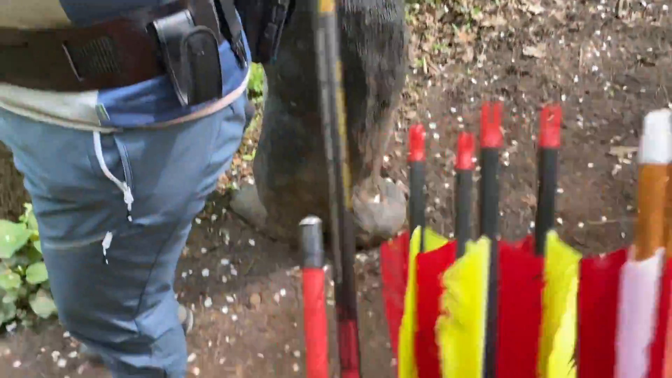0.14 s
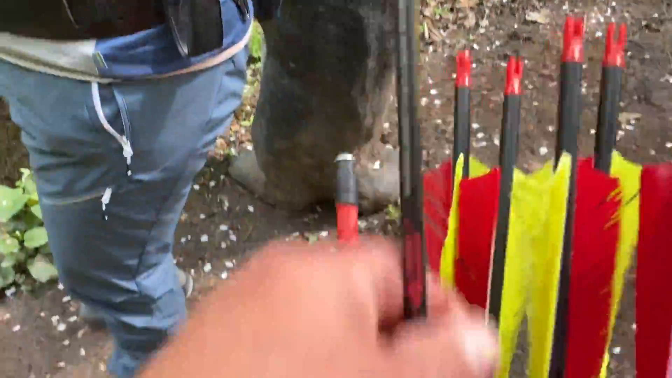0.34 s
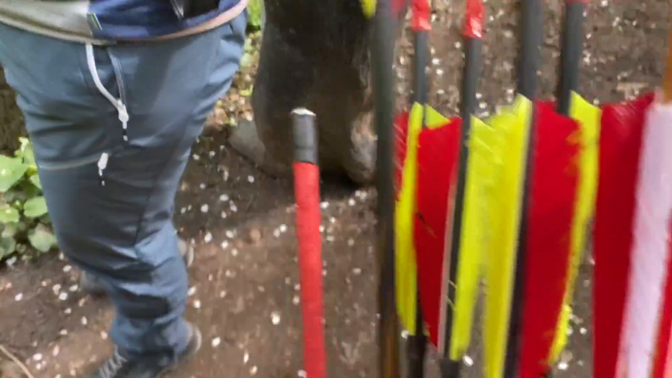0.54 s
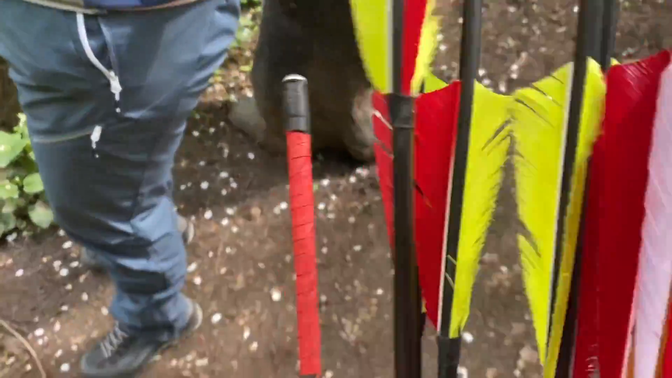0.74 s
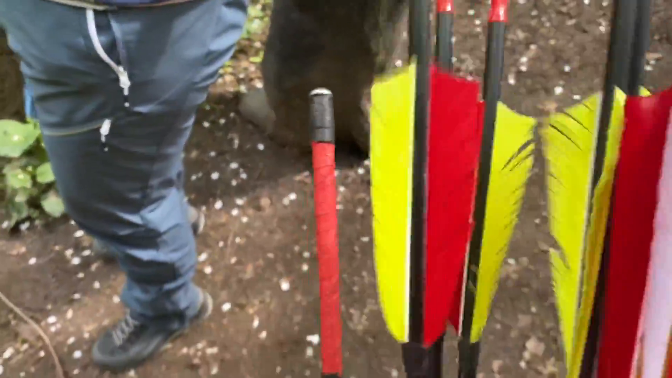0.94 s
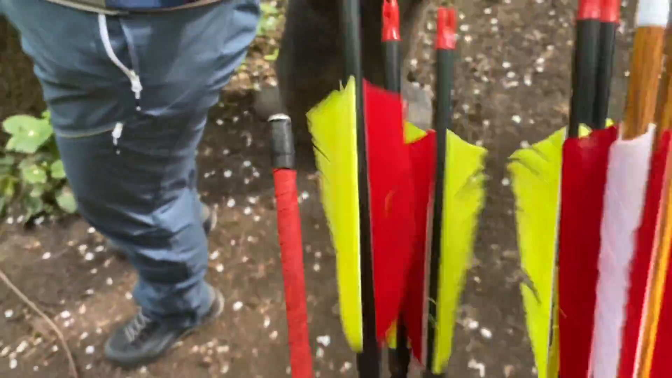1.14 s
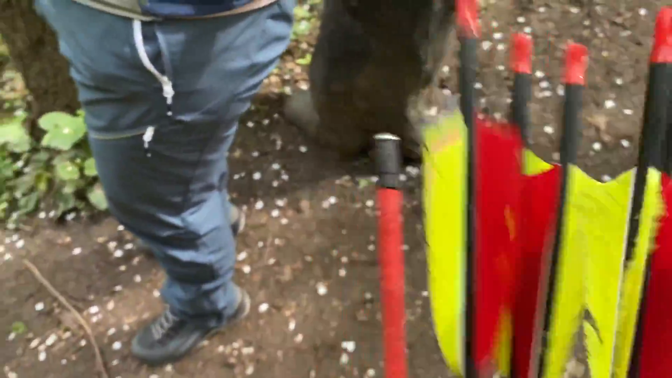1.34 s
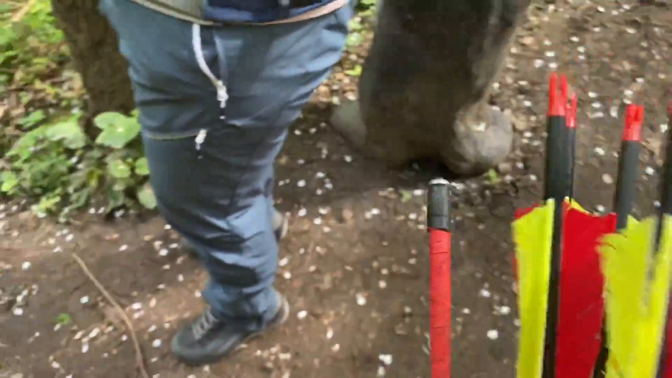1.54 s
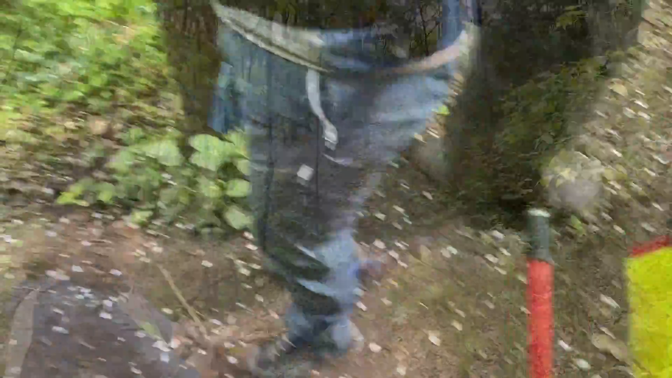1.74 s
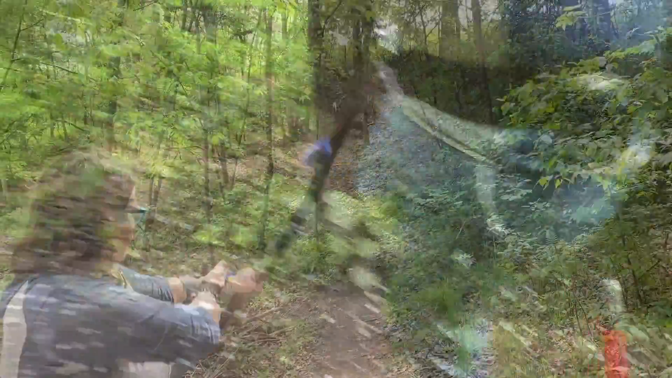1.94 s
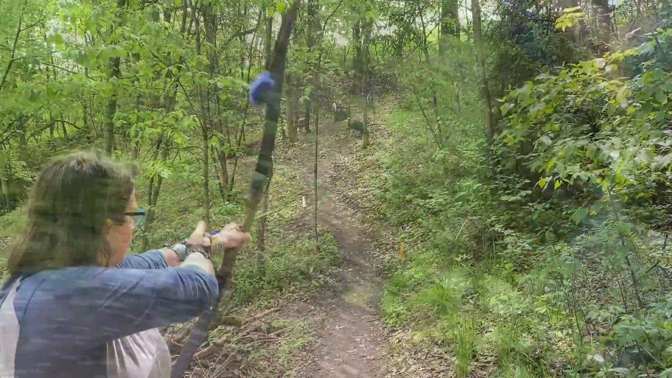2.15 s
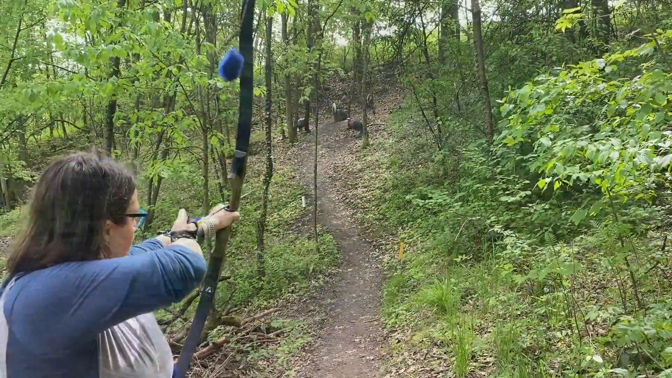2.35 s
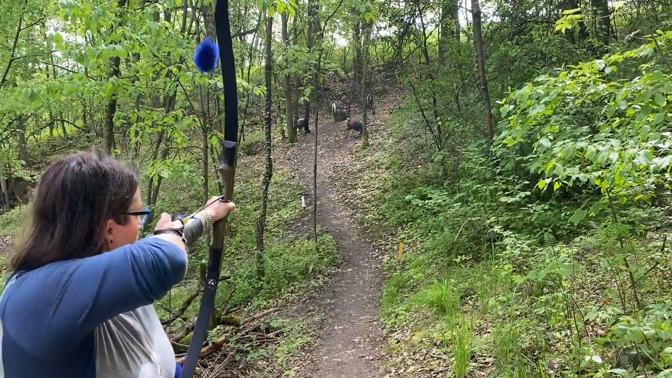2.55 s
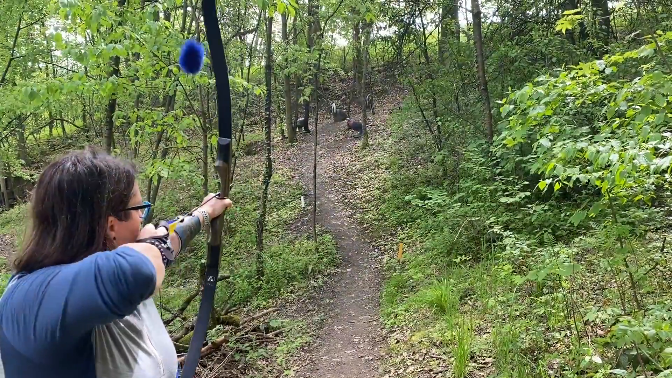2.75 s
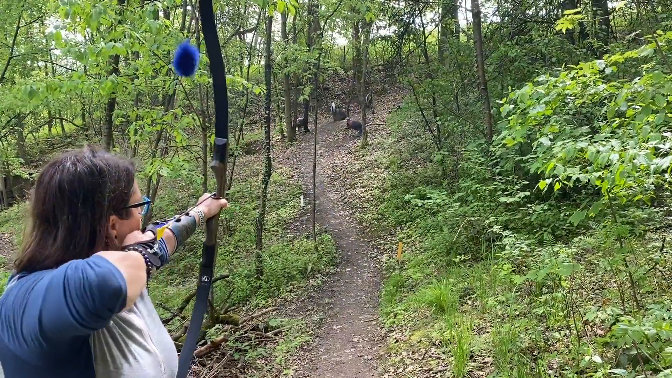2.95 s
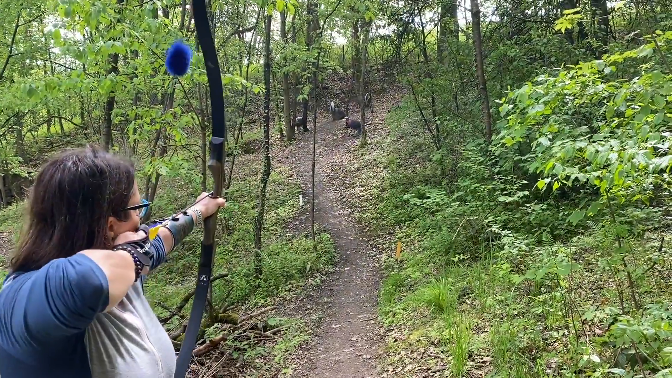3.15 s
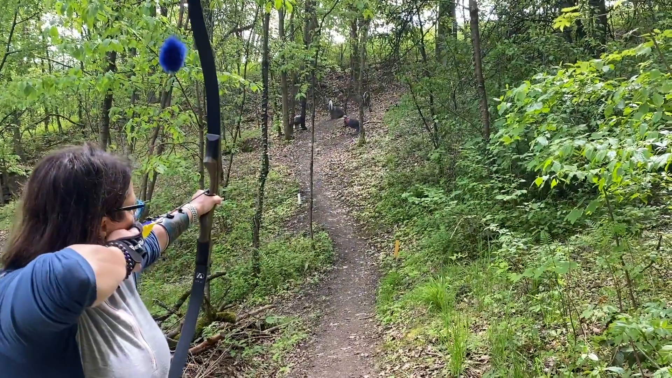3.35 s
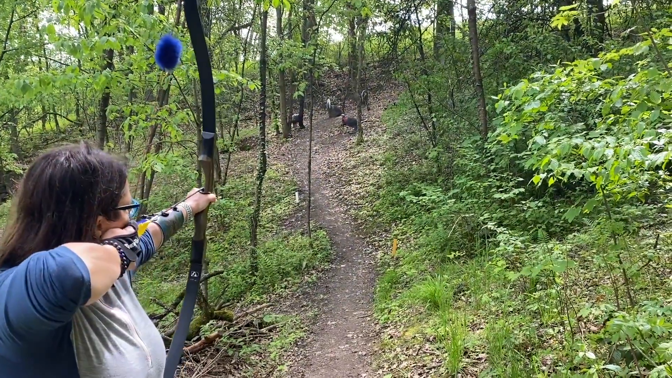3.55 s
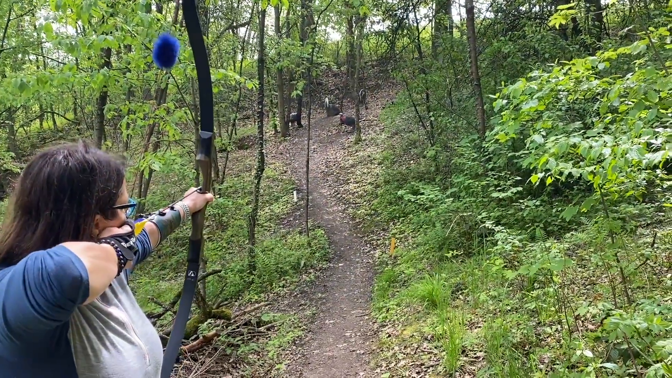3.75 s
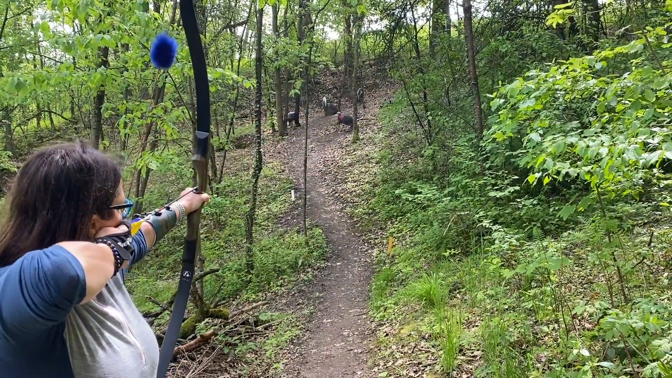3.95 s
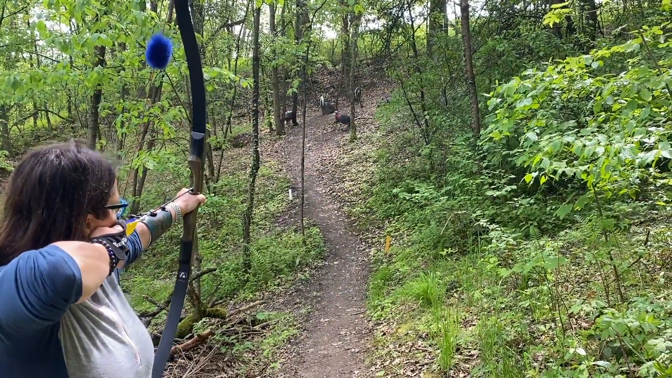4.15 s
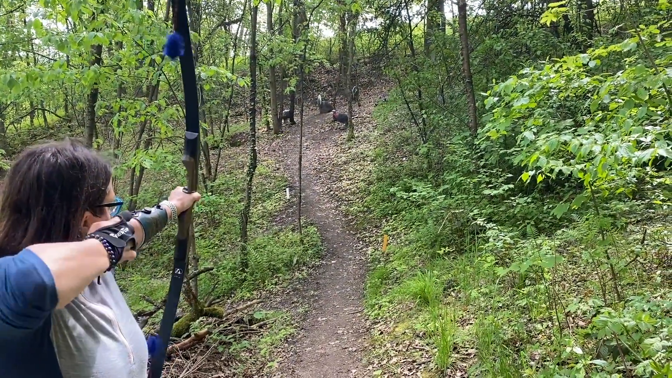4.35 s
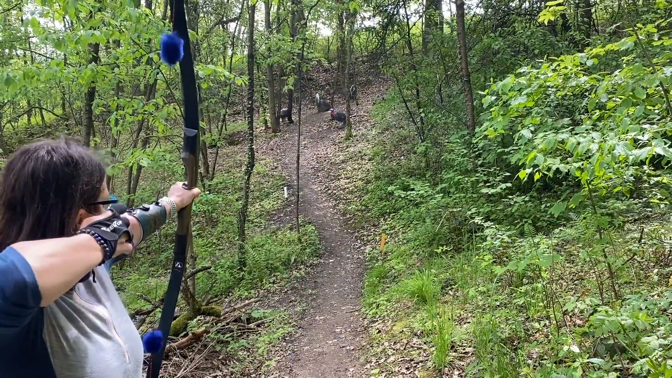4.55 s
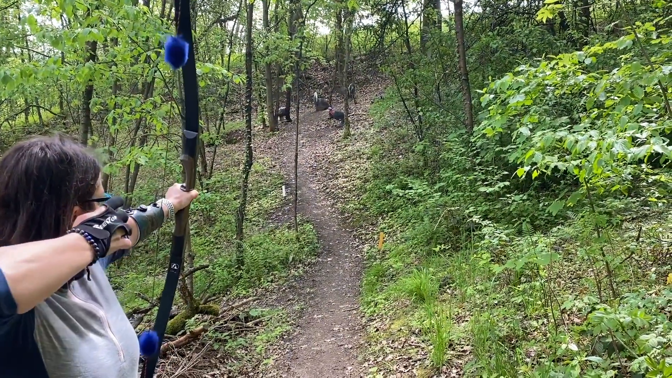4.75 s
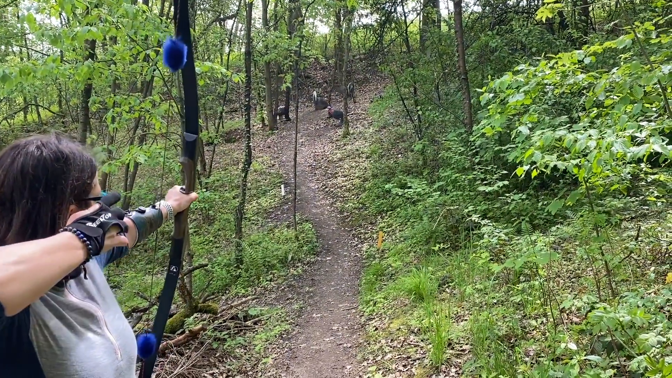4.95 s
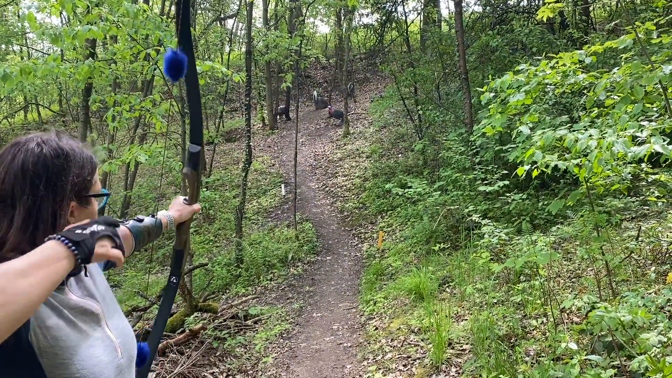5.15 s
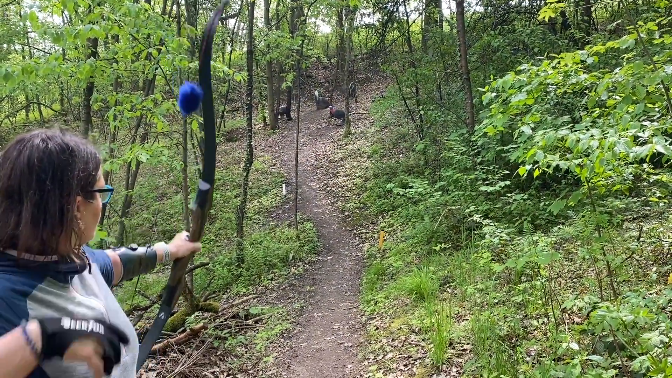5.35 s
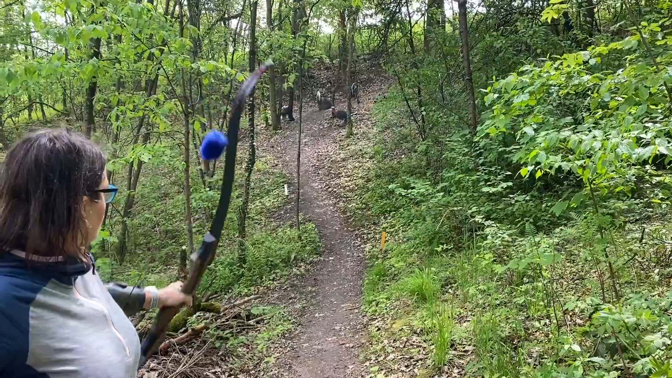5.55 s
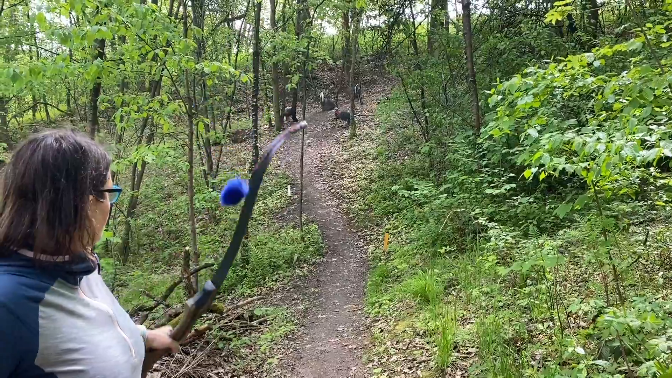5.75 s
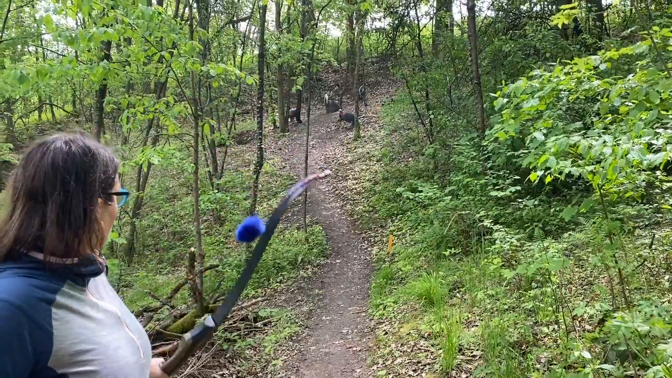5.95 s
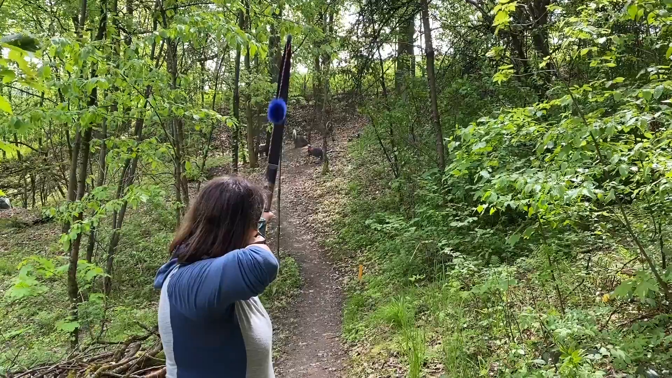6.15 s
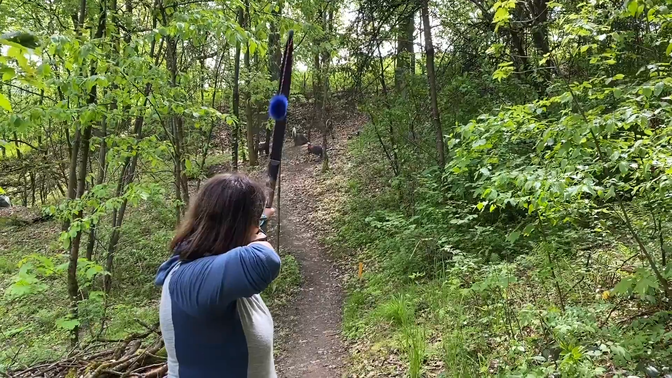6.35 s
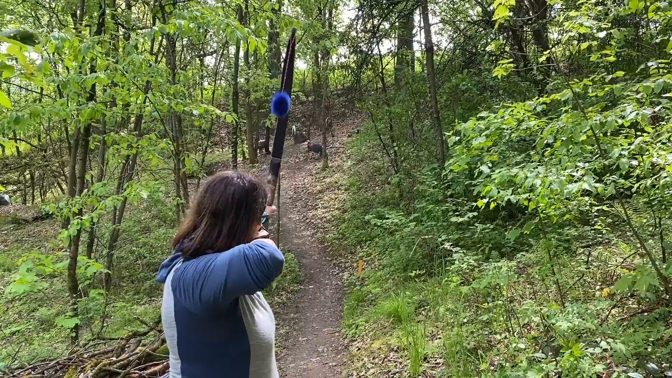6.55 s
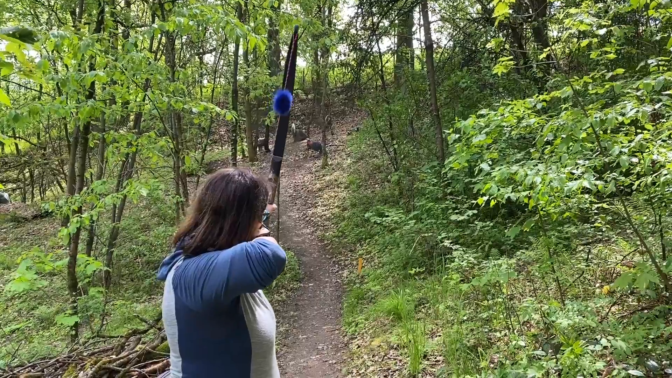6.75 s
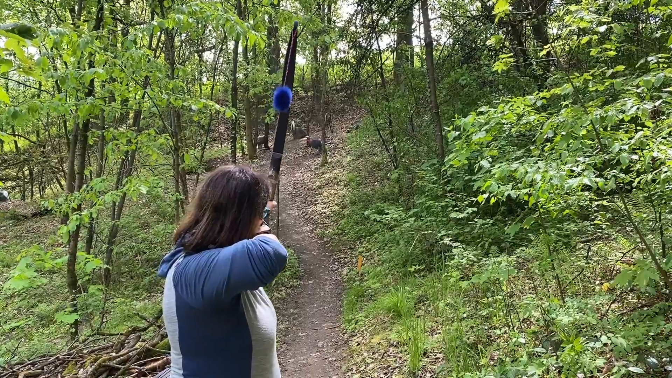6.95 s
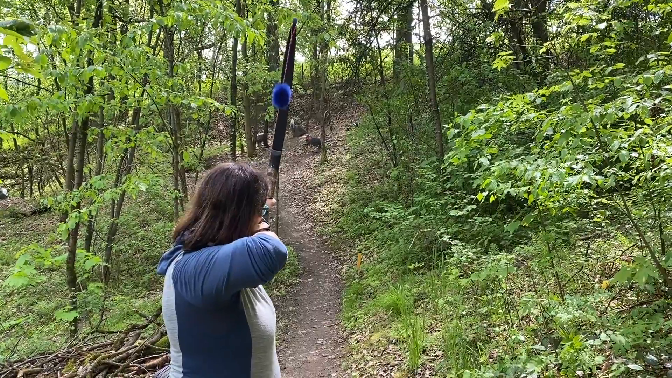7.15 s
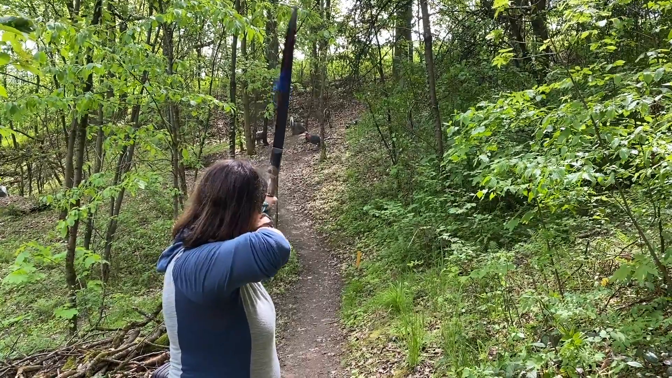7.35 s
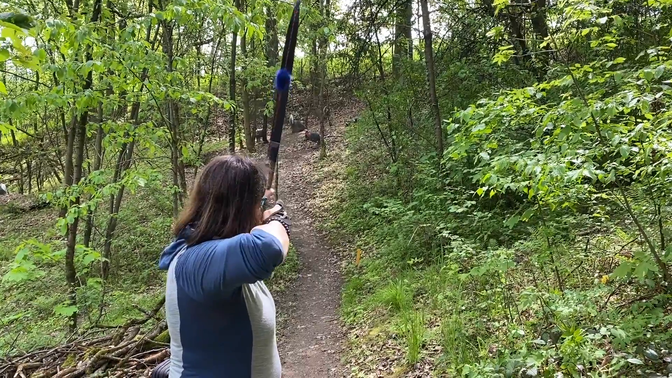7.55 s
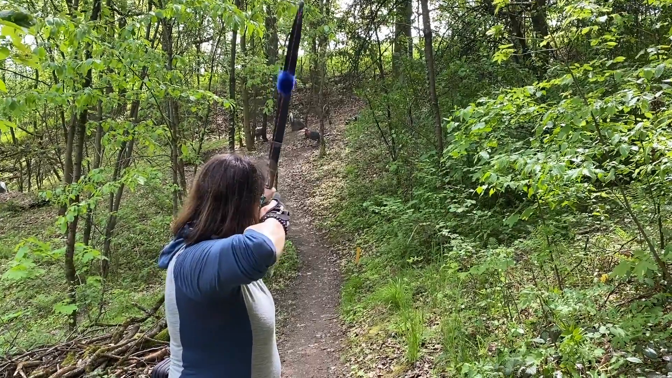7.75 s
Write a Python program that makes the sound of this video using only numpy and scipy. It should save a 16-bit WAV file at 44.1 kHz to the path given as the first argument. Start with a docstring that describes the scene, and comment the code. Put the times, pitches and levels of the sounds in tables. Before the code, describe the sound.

Outdoors in a wood, arrows are handled right at the microphone: scratchy feathers, bright rattling clacks, hollow tube knocks and soft wind bumps. After almost two seconds it falls quiet, leaving songbirds over faint hiss and rumble. One nearby bowshot snaps and thumps, its arrow landing with a dull, short distant thud. Cloth and leaves stir softly as birds chirp, then another bowshot cracks with a short woodland echo.

```python
"""Close to the microphone, arrows are pushed about in a quiver: feathers rustle as grainy noise, shafts clack
and points knock the tube as ringing modes with noise, and wind thumps the microphone as a low mode.
In the background lie a low rumble, a smooth hiss and blurred far birds, all filtered noise.
In the quiet wood a songbird whistles in gliding sines, and leaves snap as short noise bursts.
A bow is then loosed in stages of crack, grip and limb; its arrow brushes leaves and thuds into far foam.
Feathers and cloth rub again as the bow is lowered, then it is loosed once more. Trees echo the sounds."""
import sys
import numpy as np
from scipy import signal
from scipy.fft import rfft, irfft
from scipy.io import wavfile

SR = 44100
rng = np.random.default_rng(int(sys.argv[2]) if len(sys.argv) > 2 else 0)


def dump_mix(stems):
    """Bounce the given channels to the path in sys.argv[1] as a 16-bit WAV at rate SR."""
    frames = np.atleast_2d(stems).T  # one column per channel
    limited = np.clip(frames, -1, 1)  # hard clip at full scale
    pcm = np.round(limited * 32767).astype(np.int16)
    wavfile.write(sys.argv[1], SR, pcm)


N = 347949
T = np.arange(N) / SR   # s


def amp(db):
    """Decibels to gain."""
    return 10 ** (np.asarray(db) / 20)


def rms_one(x):
    """Scale to rms 1."""
    return x / np.sqrt(np.mean(x ** 2) + 1e-20)


def at_hz(points, hz):
    """Read a table on a log-frequency axis."""
    table = np.array(points)
    return np.interp(np.log(hz), np.log(table[:, 0]), table[:, 1])


def drift(rate):
    """Random points of spread 1, joined by straight lines; rate is points per second."""
    steps = rng.standard_normal(int(N / SR * 100) + 2)
    return np.interp(T * np.clip(rate, .1, 99), np.arange(len(steps)), steps)


# Likeness of the two sides of the noise. Each row: frequency in Hz, left-right correlation.
LIKENESS = [(60, 0.94), (300, 0.57), (700, 0.029), (3000, 0.19), (7000, 0.35)]
EDGES = 25 * 2 ** np.arange(0, 9.6, .5)   # half-octave band edges, Hz


def bands(length=N):
    """Half-octave bands of stereo noise, as (centre Hz, left and right)."""
    white = rng.standard_normal((2, 2, length))
    for k, (low, high) in enumerate(zip(EDGES, EDGES[1:])):
        band = signal.butter(2, [low, high], "band", fs=SR, output="sos")
        mid, side = signal.sosfilt(band, white[k % 2])
        hz = np.sqrt(low * high)
        alike = np.clip(at_hz(LIKENESS, hz), -1, 1)
        yield hz, np.sqrt(1 + alike) * mid + np.sqrt(1 - alike) * side * [[1], [-1]]


def band_noise(hz, width_hz, shape):
    """A narrow band of noise of rms 1."""
    band = signal.butter(2, [hz - width_hz / 2, hz + width_hz / 2], "band", fs=SR, output="sos")
    return rms_one(signal.sosfilt(band, rng.standard_normal(shape)))


def add(out, s, sound, pan_db=0.):
    """Mix a short sound, mono or stereo, in at time s; pan_db is how much louder the left is made."""
    i = round(s * SR)
    out[:, i:i + sound.shape[-1]] += sound[..., :N - i] * amp([[pan_db / 2], [-pan_db / 2]])


def swell(sound, rise_s):
    """A soft contact takes a moment to build up."""
    return sound * np.minimum(T[:sound.shape[-1]] / rise_s, 1)


def strike(modes, spread_db, tilt=0., detune=0., wide=.5):
    """One blow rings every mode with a strength and pitch shift of its own."""
    hz, db, t60 = np.transpose(modes)[:, :, None]
    chance = rng.standard_normal((len(modes), 3))
    hz = hz * np.exp(detune * chance[:, 1:2])
    t = T[:int(SR * t60.max()) + 64]
    gain = amp(db + spread_db * chance[:, :1] + tilt * np.log2(hz / 3000) - 60 * t / t60)
    gain = gain * (-1.) ** np.arange(len(modes))[:, None]   # neighbouring modes start in opposite sense
    skew = wide * np.minimum(hz / 2000, 1) * chance[:, 2:]   # phase, parting the sides more at high modes
    return np.array([np.sum(gain * np.sin(2 * np.pi * hz * t + side * skew), axis=0) for side in (1, -1)])


def burst(t60, tone, tilt=0., rise_s=0.00048, own=0.71):
    """Coloured noise that swells fast and dies away; each side hears a part of its own."""
    white, t = rng.standard_normal((3, 8192)), T[:8192]
    hz = np.fft.rfftfreq(8192, 1 / SR) + 1
    shape = amp(at_hz(tone, hz) + tilt * np.log2(hz / 3000)) * (hz > tone[0][0] / 2)
    noise = rms_one(irfft(rfft(white[0] + own * white[1:]) * shape))   # rms 1 before it fades
    return noise * amp(-60 * t / max(t60, .004)) * np.minimum(t / rise_s, 1)


# Feathers and cloth rubbing, first at the quiver, later as the bow is lowered.
# Each row: time in seconds, level in dB, relative brightness in dB.
RUSTLE = [
    [(0.0, -36.5, -4.5), (0.12, -39.5, -4), (0.15, -41.5, -5.5), (0.4, -55.5, 0), (0.43, -44.5, 2.5),
     (0.56, -38.5, 5.5), (0.62, -36, -3), (0.79, -45, -5.5), (0.83, -52, -5), (0.9, -39, 9),
     (0.97, -40.5, 1), (1.07, -48, -7), (1.12, -34, -10), (1.4, -32.5, -10.5), (1.56, -30, -9.5),
     (1.72, -60, -11), (2.1, -70.5, -10.5), (2.25, -51.5, -11), (2.5, -103, -13.5)],
    [(5.55, -68, -20), (5.78, -59, -16), (5.86, -53, -7), (6.1, -61, -33), (6.14, -68, -29)],
]
# Colour of rubbed feathers, shaft splash and leaves. Each row: frequency in Hz, relative dB per Hz.
RUSTLE_TONE = [(300, -4), (700, 3), (1500, -2), (3000, -3), (5000, 0), (8000, -8.5), (12000, -9),
               (16000, -12.5)]


def rustle():
    """Barbs slip in dense uneven grains with crackling ticks among them, duller or brighter by turns."""
    gain, bright = np.zeros(N), np.zeros(N)
    for rows in RUSTLE:
        s, db, bright_db = np.transpose(rows)
        on = (T >= s[0]) & (T <= s[-1])
        gain[on] = amp(np.interp(T[on], s, db))
        bright[on] = np.interp(T[on], s, bright_db)
    chance_of_tick = 160 * amp(6 * drift(12)) / SR   # ticks come in clumps
    ticks = (rng.random(N) < chance_of_tick) * np.minimum(rng.exponential(1, N), 4)
    ticks = 1 + .7 * signal.lfilter([1], [1, -.988], ticks)   # each tick dies within a few ms
    grain = 2.5 * drift(70) + 1.2 * drift(15)   # dB, shared by all bands
    rub = 0
    for hz, band in bands():
        if hz > 200:
            treble_db = np.clip(np.log2(hz / 4000), 0, 1) * (bright + 8)
            rub = rub + amp(at_hz(RUSTLE_TONE, hz) + grain + 2.7 * drift(25)) * band * amp(treble_db)
    return gain * rms_one(ticks * rub)


# Background bed, raised while the quiver is handled and after the second shot.
# Each row: time in seconds, low rumble in relative dB, smooth hiss in relative dB.
BED = [(0.0, -48.5, -74.5), (0.72, -44, -53.5), (1.551, -38.5, -57), (2.1, -51.5, -68), (3.6, -51.5, -74),
       (4.799, -47.5, -68.5), (5.4, -49.5, -71.5), (6.0, -49, -72), (7.3, -53.5, -73), (7.55, -44, -65),
       (7.89, -52.5, -64.5)]
# Colour of the low rumble. Each row: frequency in Hz, relative dB per Hz.
RUMBLE_TONE = [(25, -22.5), (40, -8), (60, -1), (100, -5.5), (200, -12.5), (400, -24), (800, -38.5)]
# Colour of the smooth hiss. Each row: frequency in Hz, relative dB per Hz.
HISS_TONE = [(200, -3), (500, -0.5), (1000, 4), (1600, -2.5), (2500, -1), (4000, -7.5), (6000, -14.5),
             (10000, -20.5), (16000, -22)]
BED_LEFT_DB = 1.62   # left raised and right lowered by this


def background_bed():
    """Lumpy low rumble and smooth hiss, both raised while the quiver is handled and after the second shot."""
    s, rumble_db, hiss_db = np.transpose(BED)
    slow, rumble, hiss = drift(7.6), 0, 0
    for hz, band in bands():
        lumps_db = 2.0 * slow + 1.1 * drift(19)
        rumble = rumble + amp(at_hz(RUMBLE_TONE, hz) - 60 * (hz > 900) + lumps_db) * band
        hiss = hiss + amp(at_hz(HISS_TONE, hz) - 60 * (hz < 200) + 1.8 * drift(3.6)) * band
    low = amp(np.interp(T, s, rumble_db)) * rms_one(rumble)
    high = amp(np.interp(T, s, hiss_db) + 6) * rms_one(hiss)
    return amp([[BED_LEFT_DB], [-BED_LEFT_DB]]) * (low + high)


# Farther birds blurred into soft bands. Each row: centre in Hz, width in Hz, middle level in dB.
CHORUS = [(2100, 430, -77.5), (2630, 500, -84.5), (3472, 960, -81)]


def chorus():
    """Narrow bands of noise that come and go like distant phrases."""
    out = 0
    for hz, width_hz, db in CHORUS:
        out = out + amp(db + 3.9 * drift(11)) * band_noise(hz, width_hz, (2, N))
    return out


# The clear clacks of shaft against shaft. Each row: start in seconds, relative level in dB,
# tilt in dB per octave.
CLACKS = [(0.0979, -28.5, -7), (0.1746, -33, -7.5), (0.2736, -37.5, -4), (0.428, -38.5, 13.5),
          (0.5978, -30, -2), (0.6867, -25, -2.5), (0.7222, -26.5, -7), (0.8911, -13, 1.5), (0.922, -20, 5),
          (0.9555, -18.5, -0.5), (1.1613, -8.5, 0.5), (1.1848, -11.5, -0.5), (1.2343, -18, 1),
          (1.3718, -15, 0), (1.4002, -8, 0.5), (1.4269, -18, 3), (1.4593, -19, -2.5), (1.5006, -4, -6.5),
          (1.5536, -21.5, 10), (1.5771, -6.5, 2), (1.6086, -0.5, 3.5), (1.6297, -6, -2.5),
          (1.677, -23.5, -2), (1.7058, -31, -2.5), (1.7837, -41, 1), (1.9354, -45.5, 2),
          (2.2385, -39, -5.5)]
# Ringing modes of a shaft. Each row: frequency in Hz, relative level in dB, 60 dB decay in seconds.
SHAFT = [(1100, -6, .03), (1360, -8, .025), (1850, -1, .04), (2210, -2, .035), (2900, -6, .025),
         (3430, -6, .025), (3830, -3, .03), (4300, -4, .025), (4680, -1, .025), (5400, -4, .02),
         (6910, -3, .025), (7720, -5, .02)]
CLACK_T60_S, CLACK_LEFT_DB, CLACK_SCATTER_DB = 0.068, 0.3, 5.5
# light touches between the clacks; the tilt is per octave, either way
TOUCH_OVER_RUSTLE_DB, TOUCH_SPREAD_DB, TOUCH_TILT_DB, TOUCH_T60_S, STIR_END_S = 9, 5, 3, 0.05, 1.9


def shafts(out):
    """Shafts ring briefly under a splash of noise, pitches shifted by touching neighbours."""
    stir_s, stir_db, _ = np.transpose(RUSTLE[0])
    luck = rng.random((16, 3))
    when = STIR_END_S * luck[:, 0]
    touch_db = np.interp(when, stir_s, stir_db) + TOUCH_OVER_RUSTLE_DB + TOUCH_SPREAD_DB * (2 * luck[:, 1] - 1)
    touches = zip(when, touch_db, TOUCH_TILT_DB * (2 * luck[:, 2] - 1))
    for rows, t60 in ((CLACKS, CLACK_T60_S), (touches, TOUCH_T60_S)):
        for s, db, tilt in rows:
            pan_db = CLACK_LEFT_DB + CLACK_SCATTER_DB * rng.standard_normal()
            ring = strike(SHAFT, spread_db=3.5, tilt=tilt, detune=.08, wide=1.2)
            splash = burst(t60, RUSTLE_TONE[2:], tilt, rise_s=0.003, own=0.48)
            add(out, s, amp(db - 11) * swell(ring, 0.0015), pan_db)
            add(out, s, amp(db - 10.0) * splash, pan_db)


# Soft low thumps of wind on the microphone. Each row: start in seconds, relative level in dB.
WIND_THUMPS = [(0.175, -45), (0.733, -23), (2.136, -25.5), (3.411, -32), (6.49, -31.5)]
THUMP_HZ, THUMP_T60_S = 61.6, 0.103


def wind_thumps(out):
    """Wind on the microphone gives a soft thump, made as one low mode with a gentle start."""
    for s, db in WIND_THUMPS:
        thump = strike([(THUMP_HZ, 0, THUMP_T60_S)], spread_db=0)
        add(out, s, amp(db) * swell(thump, .012), pan_db=2.5)


# Arrow points knocking the quiver tube. Each row: start in seconds, relative level in dB,
# tube note in Hz, sharpness of the contact in dB.
KNOCKS = [(0.472, -40, 274, -12), (0.527, -29.5, 128.5, -19), (0.581, -14.5, 297.4, -13),
          (0.848, -20.5, 306, -12), (0.905, -16, 267, -12.5), (0.926, -21.5, 303, -13.5),
          (0.946, -11.5, 266, -18.5), (1.366, -13, 300, -11.5), (1.5, -12, 226, -5),
          (1.64, -15.5, 263, -10)]
# Dull buzz of wood, leather and foam. Each row: frequency in Hz, relative dB per Hz.
GRIP_TONE = [(200, -5), (300, 4), (600, 2), (1000, -12), (1800, -10.5), (3000, -20), (6000, -35)]
TUBE_RING_CYCLES = 16   # cycles to fall 60 dB


def knocks(out):
    """The tube answers each point with a hollow note, and its wall with a woody noise."""
    for s, db, hz, sharp_db in KNOCKS:
        t60 = TUBE_RING_CYCLES / hz
        tube = [(hz, 0, t60), (2.2 * hz, sharp_db, 1.1 * t60),
                (1100, sharp_db, .018), (1500, sharp_db - 3.5, .015), (1900, sharp_db - 5.0, .015)]
        add(out, s, amp(db) * swell(strike(tube, spread_db=1.5), 0.0029), pan_db=1.5)
        add(out, s, amp(db + sharp_db) * burst(0.073, GRIP_TONE, rise_s=.002), pan_db=3.5)


def close_sounds():
    """Shaft clacks, tube knocks and wind thumps, all close to or on the microphone."""
    out = np.zeros((2, N))
    shafts(out)
    knocks(out)
    wind_thumps(out)
    return out


# Echo decay among the trees. Each row: frequency in Hz, 60 dB decay in seconds.
ECHO_T60 = [(100, 0.3), (500, 0.78), (1500, 0.68), (4000, 0.68), (10000, 0.64), (16000, 0.45)]
# Echo colour among the trees. Each row: frequency in Hz, relative level in dB.
ECHO_TONE = [(100, -24.5), (500, -38), (2000, -30.5), (6000, -24.5), (16000, -34.5)]


def trees(x):
    """Trunks scatter a diffuse tail that builds up fast and dies band by band."""
    t = T[:SR]
    tail = 0
    for hz, band in bands(SR):
        if hz > 80:
            tail = tail + amp(at_hz(ECHO_TONE, hz) - 60 * t / at_hz(ECHO_T60, hz)) * band
    tail = 0.076 * tail * np.minimum(t / 0.017, 1)
    return signal.fftconvolve(x.mean(axis=0)[None], tail)[:, :N]


# Songbird notes. Each row: start in seconds, length in seconds, start pitch in Hz, end pitch in Hz,
# relative level in dB.
SONG = [(1.856, .055, 3500, 3400, -54), (1.88, .05, 1990, 2150, -55.5), (1.905, .05, 3150, 2890, -57),
        (2.31, .1, 2598, 2603, -56.5), (2.425, .035, 3010, 3110, -58.5), (2.455, .025, 3000, 2398, -59),
        (2.685, .05, 2840, 2866, -50), (2.713, .016, 2700, 2300, -65), (2.745, .065, 3090, 3170, -57.5),
        (2.808, .018, 4700, 3340, -58), (2.83, .043, 4510, 4400, -69), (2.859, .055, 2060, 2350, -60),
        (2.985, .05, 3680, 2473, -57.5), (3.02, .05, 3050, 2766, -50.5), (3.17, .075, 3275, 3150, -58.5),
        (3.214, .022, 4420, 3900, -68.5), (3.286, .09, 3610, 3476, -61.5), (3.3, .06, 3040, 2820, -60.5),
        (3.39, .05, 2040, 1857, -66), (3.379, .014, 3740, 4820, -61), (3.482, .014, 2890, 4260, -57),
        (3.53, .05, 2550, 2420, -62.5), (3.627, .09, 3700, 3150, -60.5), (3.7, .028, 3300, 2900, -65.5),
        (3.79, .036, 2484, 2452, -56.5), (3.8, .07, 3220, 3235, -60), (3.826, .016, 3380, 4200, -66.5),
        (3.836, .016, 4200, 3330, -64.5), (3.876, .02, 3810, 3100, -68), (3.88, .05, 2510, 2390, -65.5),
        (3.985, .06, 2466, 2340, -63), (4.1, .11, 2890, 2440, -57.5), (4.186, .03, 3580, 4780, -59.5),
        (4.42, .05, 2700, 2870, -50.5), (5.15, 0.011, 3200, 3970, -62), (5.16, 0.017, 3920, 3320, -54),
        (5.171, 0.013, 3330, 3900, -58), (5.399, .06, 2330, 2295, -67), (5.41, .045, 2910, 3280, -59),
        (6.002, 0.037, 2660, 2560, -65), (6.026, .07, 2534, 2414, -56), (6.112, .035, 3200, 2850, -54.5),
        (6.158, 0.051, 4150, 3420, -56.5), (6.278, .07, 3064, 3370, -54.5), (6.3, .05, 4455, 4530, -66),
        (6.56, .22, 4290, 4090, -70), (6.719, 0.13, 2140, 2090, -78), (6.921, 0.14, 1945, 1900, -72.5),
        (7.11, .14, 2180, 2140, -76.5), (7.207, .02, 4860, 4060, -67), (7.228, .016, 4200, 3430, -68),
        (7.246, 0.027, 4000, 4050, -67), (7.264, 0.042, 4000, 3530, -67)]
GLIDE_EASE, SONG_LEFT_DB = 0.72, 3.5   # ease under 1: the glide is quickest at its start


def whistles(out):
    """Each note is a gliding sine, unsteady in pitch."""
    wobble = np.exp(.012 * drift(99))
    for s, length, start_hz, end_hz, db in SONG:
        u = np.linspace(0, 1, int(length * SR))
        hz = (start_hz + (end_hz - start_hz) * u ** GLIDE_EASE) * wobble[round(s * SR):][:len(u)]
        tone = np.sin(2 * np.pi * np.cumsum(hz) / SR)
        add(out, s, amp(db) * np.sin(np.pi * u) ** 0.28 * tone, SONG_LEFT_DB)


# A high wheezy call. Each row: start in seconds, length in seconds, centre in Hz, width in Hz,
# relative level in dB.
WHEEZE = [(5.446, 0.11, 5910, 665, -67), (6.892, 0.09, 7470, 602, -78)]


def wheezes(out):
    """Each wheeze is a narrow hiss that swells and fades."""
    for s, length, hz, width_hz, db in WHEEZE:
        hiss = band_noise(hz, width_hz, SR // 2)[:int(length * SR)]
        add(out, s, amp(db) * hiss * np.sin(np.linspace(0, np.pi, len(hiss))) ** 0.55, pan_db=6.0)


FLUTTER_HZ, FLUTTER_DEPTH = 220, 0.53   # low-pass edge and depth of the roughening


def birds():
    """Far calls waver in strength, roughened by the many paths through the leaves."""
    out, waver = np.zeros((2, N)), amp(2.5 * drift(60))
    whistles(out)
    wheezes(out)
    flutter = signal.sosfilt(signal.butter(2, FLUTTER_HZ, fs=SR, output="sos"), rng.standard_normal((2, N)))
    return out * waver * (1 + FLUTTER_DEPTH * rms_one(flutter))


# Leaves and twigs brushed or snapped. Each row: start in seconds, relative level in dB,
# tilt in dB per octave.
SNAPS = [(2.44, -48, -1.5), (2.739, -43, -5.5), (3.922, -57, 1.5), (4.65, -35, 1), (4.667, -15, -3),
         (5.093, -51, 1), (5.833, -34.5, 1.5), (5.854, -32.5, -1.5), (5.88, -46, -5.5), (5.957, -42, -6),
         (6.038, -42, -17), (6.075, -40, -14), (6.219, -41.5, -6), (6.232, -43, -8.5), (6.448, -45, .5)]
SNAP_T60_S = 0.046


def leaves():
    """Small dry snaps of noise."""
    out = np.zeros((2, N))
    for s, db, tilt in SNAPS:
        snap = burst(SNAP_T60_S, RUSTLE_TONE[2:], tilt, rise_s=0.004)
        add(out, s, amp(db - 8.5) * snap, pan_db=4.0)
    return out


# Looses. Each row: finger slip in seconds, strength in dB, seconds until the shaft slaps the bow,
# crack of that slap in dB.
SHOTS = [(4.227, 0.5, .018, -14.5), (7.358, -0.5, 0.025, -18.5)]
# Stages of every loose: finger slip, arrow runs, limbs swing home, slam, swing back, string slaps, rebounds.
# Each row: seconds after the slip, then crack, grip and limb in relative dB.
STAGES = [(0.0, -41.5, -29, -50), (0.0107, -29, -29, -36), (.018, -31, -23.5, -8.5),
          (.024, -26.5, -15, -5.5), (.035, -18, -19.5, -17.5), (.043, -13.5, -10.5, -21.5),
          (.049, -23, -20.5, -26)]
# Modes of the bow limbs. Each row: frequency in Hz, relative level in dB, 60 dB decay in seconds.
LIMBS = [(66, -19, 0.545), (129.34, -27, 0.85), (197.3, -29, 0.77), (172, 3.5, 0.031), (92, -1, 0.037),
         (280.3, -11.5, 0.083)]
# Modes of the grip. Each row: frequency in Hz, relative level in dB, 60 dB decay in seconds.
GRIP = [(480, 0.5, 0.024), (603.5, 0, 0.1), (715, 1, 0.024), (956, 0.5, 0.093), (1214, 0, 0.03),
        (1570, -0.5, .03), (2834, 2.5, 0.014)]
# Colour of the crack. Each row: frequency in Hz, relative dB per Hz.
CRACK_TONE = [(1000, -2), (2000, 4.5), (4000, -0.5), (7000, -0.5), (11000, -0.5), (16000, -1.5)]
CRACK_T60_S, SLAP_T60_S, CRACK_LEFT_DB = 0.036, 0.028, 3.5
# the string then shudders four times: spacing in seconds, then first crack, grip and limb in relative dB
SETTLE_S, SETTLE_CRACK_DB, SETTLE_GRIP_DB, SETTLE_LIMB_DB = .017, -24.5, -21, -20.5
CRACK_LOSS_DB, GRIP_LOSS_DB, LIMB_LOSS_DB = 9, 7.5, -0.1   # dB lost per shudder; negative: the limbs grow slightly


def bow():
    """Each stage shakes the limbs, buzzes in the grip and cracks in the treble."""
    out = np.zeros((2, N))
    shudders = [(STAGES[-1][0] + SETTLE_S * (k + .5) ** 1.1,
                 SETTLE_CRACK_DB - CRACK_LOSS_DB * k,
                 SETTLE_GRIP_DB - GRIP_LOSS_DB * k,
                 SETTLE_LIMB_DB - LIMB_LOSS_DB * k) for k in range(4)]
    for slip_s, shot_db, slap_s, slap_db in SHOTS:
        add(out, slip_s + slap_s, amp(slap_db) * burst(SLAP_T60_S, CRACK_TONE, own=.9), CRACK_LEFT_DB)
        for after_s, crack_db, grip_db, limb_db in list(STAGES) + shudders:
            s = slip_s + after_s
            crack = burst(CRACK_T60_S, CRACK_TONE, own=0.7)
            grip_ring = swell(strike(GRIP, spread_db=0.0, detune=0.063), .001)
            grip_buzz = burst(0.076, GRIP_TONE, rise_s=0.0055)
            limb_ring = swell(strike(LIMBS, spread_db=0.5, detune=0.04), 0.0015)
            add(out, s, amp(shot_db + crack_db) * crack, CRACK_LEFT_DB)
            add(out, s, amp(shot_db + grip_db - 5.5) * grip_ring, pan_db=-2.1)
            add(out, s, amp(shot_db + grip_db - 3.5) * grip_buzz, pan_db=4.0)
            add(out, s, amp(shot_db + limb_db) * limb_ring, pan_db=2.5)
    return out


# The arrow at the target. Each row: start in seconds, relative level in dB.
THUD = [(4.701, -9.5)]
# Modes of the foam. Each row: frequency in Hz, relative level in dB, 60 dB decay in seconds.
FOAM = [(120, -16.5, 0.0647), (216.6, -15, 0.059), (567, -7.5, 0.036), (839, -1.5, 0.013),
        (1200, 5.5, 0.0061), (1500, 6, 0.0055), (2024, 6, 0.0064), (3800, -10, 0.0073)]


def target():
    """A dull thud of short-lived foam modes and noise, answered at once by the ground."""
    out = np.zeros((2, N))
    for s, db in THUD:
        thud = amp(db) * swell(strike(FOAM, spread_db=3.0, wide=0.3), 0.002)
        ground = amp(-9.5) * signal.lfilter([.08], [1, -.92], thud)   # dulled reflection
        add(out, s, thud, pan_db=-3.5)
        add(out, s + 0.0076, ground, pan_db=-4.0)
        add(out, s, amp(db - 11) * burst(0.07, GRIP_TONE, rise_s=0.0038), pan_db=7.0)
    return out


def scene():
    """Near quiver and bow with a little echo of the trees, far target and birds deep in it."""
    shots, thud, snaps, song, near = bow(), target(), leaves(), birds(), close_sounds()
    echo = trees(shots + amp(11.0) * thud + amp(7.5) * snaps + amp(-14.5) * near + amp(10.5) * song)
    foreground = near + rustle() + shots + thud + snaps + amp(-2.5) * song
    return foreground + echo + chorus() + background_bed()


SHARED_HZ, TURN_HZ = 6890, 4134   # treble fully shared from here; each half turn of phase spans TURN_HZ
LOW_CUT_HZ, STOP_HZ = 40, 16900   # bass roll-off; treble is 70 dB down from STOP_HZ up


def record(dry):
    """The top treble is common to both sides, its phase turned apart; peaks clip, both ends are cut."""
    hz, sides = np.fft.rfftfreq(N, 1 / SR), rfft(dry)
    turn = np.pi * np.clip(hz - SHARED_HZ, 0, 2 * TURN_HZ) / TURN_HZ
    common = amp(4.0) * sides.mean(axis=0) * np.exp(1j * turn * [[-1], [1]])
    share = np.sin(np.pi / 2 * np.clip(hz / 1000 - SHARED_HZ / 1000 + 1, 0, 1)) ** 2   # over 1 kHz
    sides = share * common + (1 - share) * sides
    wet = signal.sosfilt(signal.butter(3, LOW_CUT_HZ, "high", fs=SR, output="sos"), irfft(sides, N))
    return signal.sosfilt(signal.cheby2(12, 70, STOP_HZ, fs=SR, output="sos"), np.clip(wet, -1, 1))


dry = scene()
out = record(dry)
dump_mix(out)
```